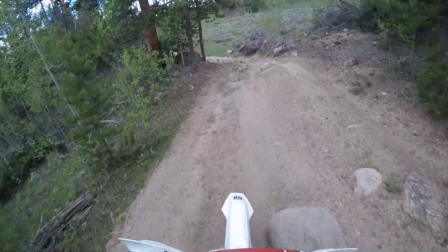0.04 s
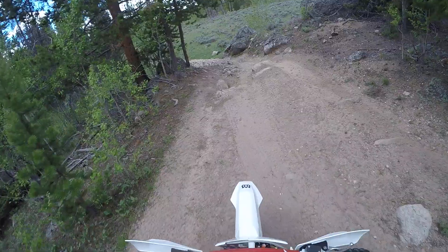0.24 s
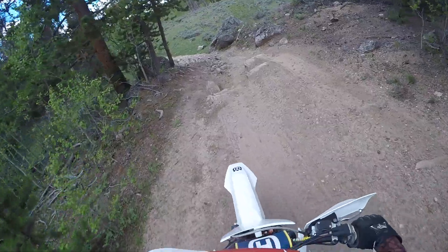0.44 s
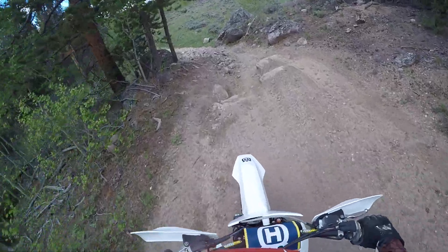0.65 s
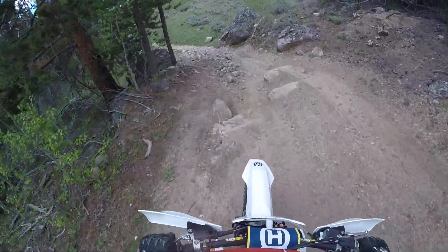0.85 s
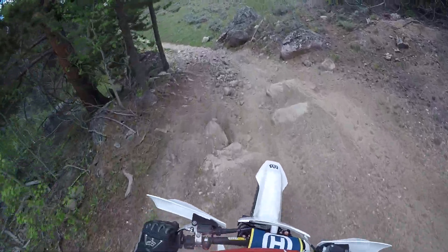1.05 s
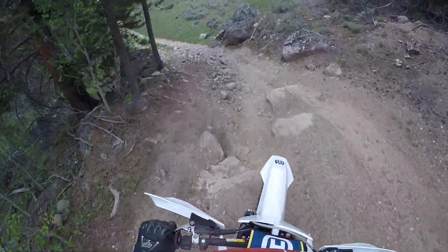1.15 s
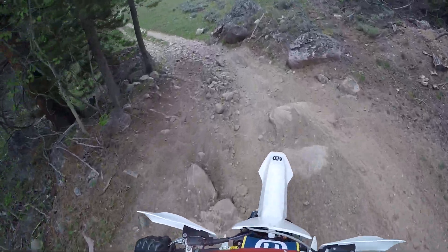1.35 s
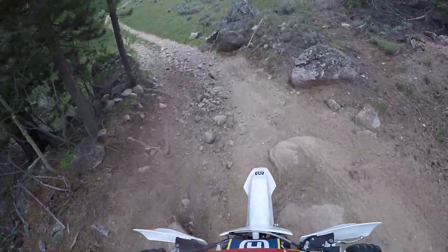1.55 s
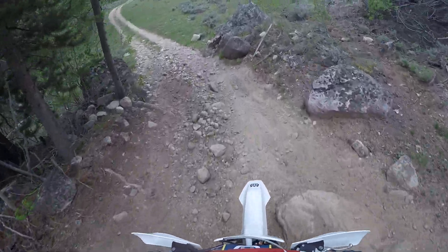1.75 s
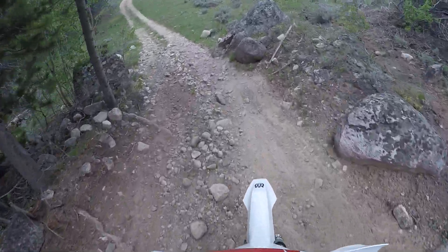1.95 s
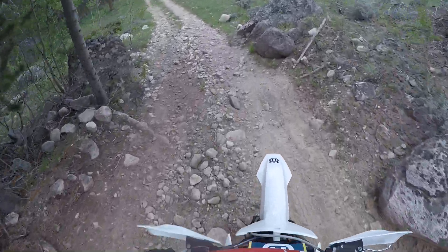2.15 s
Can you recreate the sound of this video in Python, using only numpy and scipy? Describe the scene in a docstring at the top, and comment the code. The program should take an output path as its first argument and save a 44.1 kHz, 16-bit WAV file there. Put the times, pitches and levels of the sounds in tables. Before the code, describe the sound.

Dirt bike engine thuds just above idle with metallic rattle, tyres grinding over a gritty trail

```python
"""Low thuds, a deep throb and a metallic rattle: a dirt bike rolls down a trail just above idle.
Its one-cylinder four-stroke engine is heard from the rider's place. The exhaust booms once a cycle, the
crank adds a deep tone, and chain and valves tap the ringing engine case, with a faint high whine.
The tyres are dense random grit, which scrubs harder near the end with a ringing wheel and gravel; fine
sand sizzles most before the middle. Air is filtered noise, a narrow hiss fades, one knock starts it all."""
import sys
import numpy as np
from scipy import signal
from scipy.fft import rfft, irfft
from scipy.io import wavfile

SR = 44100
rng = np.random.default_rng(int(sys.argv[2]) if len(sys.argv) > 2 else 0)


def generate_wav(signal):
    """Clip the signal to [-1, 1] and save it as 16-bit WAV at the path in sys.argv[1]."""
    frames = np.transpose(np.atleast_2d(signal))
    scaled = np.clip(frames, -1, 1) * 32767
    pcm = np.round(scaled).astype(np.int16)
    wavfile.write(sys.argv[1], SR, pcm)


N = 96711
TIME = np.arange(N) / SR  # seconds


def amp(db):
    """Turns decibels into a gain."""
    return 10 ** (np.asarray(db) / 20)


def unit(x):
    """Scales a sound to an rms (average strength) of 1."""
    return x / np.sqrt(np.mean(x ** 2) + 1e-20)


def curve(points):
    """Joins (time [s], value) points by straight lines."""
    return np.interp(TIME, *np.transpose(points))


def drift(top_hz):
    """Slow random motion of rms 1, mostly below top_hz."""
    hz = np.fft.rfftfreq(N, 1 / SR)
    low_pass = (hz > 0) / (1 + (hz / top_hz) ** 4)
    return unit(irfft(rfft(rng.standard_normal(N)) * low_pass, N))


def colour(x, points, size=16384):
    """Filters a sound to a (frequency [Hz], gain [dB]) shape without any sound ahead of its cause."""
    hz, db = np.transpose(points)
    bins_hz = abs(np.fft.fftfreq(size, 1 / SR))
    log_gain = np.log(amp(np.interp(np.log(bins_hz + 1), np.log(hz), db)))
    # the Hilbert transform finds the phase that makes the filter respond as early as possible
    spectrum = np.exp(np.conj(signal.hilbert(log_gain)))
    response = np.fft.ifft(spectrum).real[:size // 2]
    return signal.fftconvolve(x, response)[:N]


def grains(per_s, spread_db):
    """Tiny impacts at random moments, of random sign and uneven size, scaled to rms 1."""
    hits = rng.random(N) < per_s / SR
    signs = rng.choice([-1, 1], N)
    sizes = amp(spread_db * rng.standard_normal(N))
    return unit(hits * signs * sizes)


def ring(x, hz, width):
    """One decaying resonance: the wider its band (width [Hz]), the faster it dies away."""
    t = TIME[:SR // 10]
    response = width * np.exp(-np.pi * width * t) * np.sin(2 * np.pi * hz * t)
    return signal.fftconvolve(x, response)[:N]


def air():
    """Air on the microphone: lumpy low buffeting and a faint even rush, both filtered noise."""
    # tone of the buffeting: (frequency [Hz], gain [dB])
    buffet_tone = [(4, -59), (18, 7.5), (34, -3.5), (56, -4.5), (95, 0), (125, -17.5), (170, -26.5),
                   (300, -36.5), (500, -35.5), (900, -40.5), (2000, -103.5)]
    # gusts of the buffeting: (time [s], level [dB])
    gust_level = [(0, -27), (.07, -41.5), (.18, -37.5), (.32, -38), (.4, -36.5), (.54, -42.5), (.74, -40),
                  (.95, -48), (1.22, -36.5), (1.35, -43), (1.6, -41), (1.75, -38), (1.86, -36),
                  (1.93, -38.5), (2.19, -39)]
    # tone of the steady rush: (frequency [Hz], gain [dB])
    rush_tone = [(100, -4), (450, 1.5), (800, -8.5), (3000, -11.5), (5000, -13), (6300, -21.5), (8000, -22),
                 (11000, -24.5), (14000, -29.5), (16000, -37)]
    swell_db, swell_hz, rush_db = -1, 0.43, -61

    buffeting = unit(colour(rng.standard_normal(N), buffet_tone))
    buffeting *= amp(curve(gust_level) + swell_db * drift(swell_hz))
    rush = amp(rush_db) * unit(colour(rng.standard_normal(N), rush_tone))
    return buffeting + rush


def hiss():
    """A narrow band of hiss, noise through two equal resonances, that dies away."""
    centre_hz, width_hz, start_db, fade_db_per_s = 2425, 320, -53, 27
    band = ring(rng.standard_normal(N), centre_hz, width_hz)
    band = ring(band, centre_hz, width_hz)
    return amp(start_db - fade_db_per_s * TIME) * unit(band)


def whine(turns):
    """A thin, faint engine whine: noise in a narrow resonance, pulsing with each crank turn."""
    whine_hz, width_hz, level_db, pulsing_depth = 8600, 91, -81.5, 0.23
    pulsing = 1 + pulsing_depth * np.cos(2 * np.pi * 2 * turns)
    return amp(level_db) * unit(pulsing * ring(rng.standard_normal(N), whine_hz, width_hz))


def knock():
    """A short hollow knock from the bike and its rebound: fading rings and a burst of clatter."""
    # the blow and its rebound: (time [s], level [dB])
    blows = [(.0015, -33.5), (.0092, -39.5)]
    # rings of each blow: (frequency [Hz], level within the blow [dB], time to fade by 60 dB [s])
    knock_rings = [(790, -7.5, 0.042), (940, -7.5, 0.022), (1090, 1.5, .042), (1270, -22, 0.046)]
    # tone of the clatter: (frequency [Hz], gain [dB])
    clatter_tone = [(300, -3.5), (620, -26), (760, 6), (900, 3), (1060, 1.5), (1280, -13), (1600, -26),
                    (5000, -55)]
    clatter_db, clatter_t60_s = -0.5, 0.05  # level beside the rings, time to fade by 60 dB

    out = np.zeros(N)
    for start, level_db in blows:
        t = np.maximum(TIME - start, 0)
        rings = np.zeros(N)
        for hz, db, t60 in knock_rings:
            rings += amp(db) * np.exp(-np.log(1000) * t / t60) * np.sin(2 * np.pi * hz * t)
        fade = (t > 0) * np.exp(-np.log(1000) * t / clatter_t60_s)
        clatter = fade * unit(colour(rng.standard_normal(N), clatter_tone))
        out += amp(level_db) * (rings + amp(clatter_db) * clatter)
    return out


def tyres():
    """Dense grit grinds under the tyres, rings the front wheel and throws up gravel and fine sand."""
    # tone of the grit: (frequency [Hz], gain [dB])
    grit_tone = [(200, -5.5), (500, -6), (800, -10), (1120, -3), (1280, -3), (1520, -9.5), (1900, -4),
                 (2500, -1.5), (3100, -1.5), (3320, -11), (3550, -8), (4300, -19.5), (5500, -30),
                 (8000, -40), (15000, -51)]
    # grit as the tyres scrub: (time [s], level [dB])
    scrub_level = [(0, -54.5), (.13, -55), (.3, -53.5), (.48, -50), (.56, -54.5), (.7, -53.5), (.95, -59),
                   (1.22, -56.5), (1.5, -56.5), (1.59, -60.5), (1.64, -55.5), (1.7, -57.5), (1.83, -45.5),
                   (1.94, -47.5), (2.08, -48), (2.19, -50)]
    # loose stones crunching: (time [s], length [s], added level [dB])
    crunches = [(1.847, 0.017, 1.5), (1.882, .02, 3), (1.98, 0.026, 3), (2.05, 0.042, 3)]
    # tone of the coarse gravel: (frequency [Hz], gain [dB])
    gravel_tone = [(1500, -25), (2200, -2.5), (2500, 4.5), (3100, -1), (3320, -3.5), (3550, -4),
                   (4100, -8.5), (5000, -27), (9000, -41)]
    # gravel spraying when the tyre bites: (time [s], level [dB])
    gravel_level = [(1.62, -90), (1.74, -60), (1.84, -52.5), (1.95, -53.5), (2.05, -56), (2.19, -67)]
    # ring of the front wheel as it scrubs: (time [s], level [dB])
    wheel_level = [(0, -57), (.36, -57.5), (.45, -50), (.56, -59), (.68, -54), (.85, -75), (1.2, -66),
                   (1.55, -66), (1.72, -56), (1.79, -49.5), (1.835, -46), (1.92, -47.5), (1.98, -50),
                   (2.04, -48), (2.19, -58)]
    # tone of the fine sand: (frequency [Hz], gain [dB])
    sand_tone = [(2500, -35.5), (4100, -3.5), (4600, 0.5), (5000, 0.5), (5500, -10), (6200, -14),
                 (6850, -9.5), (7500, -24), (12000, -27)]
    # spraying sand: (time [s], level [dB])
    sand_level = [(0, -68), (.45, -70.5), (.65, -65), (.82, -65.5), (1.1, -71.5), (1.5, -70), (1.7, -76),
                  (2.19, -68)]
    grit_per_s, gravel_per_s, grain_spread_db = 12000, 2800, 2.5
    flicker_db, flicker_hz = .5, 21
    wheel_hz, wheel_width_hz = 1505, 325

    flicker = flicker_db * drift(flicker_hz)
    crunch = sum(db * np.exp(-(2 * (TIME - at) / length) ** 2) for at, length, db in crunches)

    grit = unit(colour(grains(grit_per_s, grain_spread_db), grit_tone))
    grit *= amp(curve(scrub_level) + flicker + crunch)

    gravel = unit(colour(grains(gravel_per_s, grain_spread_db), gravel_tone))
    gravel *= amp(curve(gravel_level) + flicker + crunch)

    wheel = ring(grains(grit_per_s, grain_spread_db), wheel_hz, wheel_width_hz)
    wheel = ring(wheel, wheel_hz, wheel_width_hz)  # the second pass narrows the band
    wheel = amp(curve(wheel_level)) * unit(wheel)

    sand = unit(colour(grains(grit_per_s, grain_spread_db), sand_tone))
    sand *= amp(curve(sand_level))
    return grit + gravel + wheel + sand


def rattle(turns):
    """The chain patters steadily on the ringing case; valves tap it at fixed places with varying force."""
    # valve gear strokes: (place [cycles], width [cycles], level [dB], brightness [dB per octave])
    valve_strokes = [(.15, 0.019, 4, 6), (.22, 0.064, 2.5, -3), (.29, 0.01, 6, 7.5), (.44, 0.074, -6, 2.5),
                     (.595, 0.038, 3.5, -3), (.66, 0.018, 6.5, 2.5), (.81, .02, 5, 2),
                     (.91, 0.058, 5.5, 0.5)]
    # rings of the engine case: (frequency [Hz], width [Hz], gain [dB])
    case_rings = [(1100, 78, 2.5), (1357, 78, -3.5), (1420, 520, -12), (1850, 230, 0.5), (2252, 73, 5.5),
                  (2497, 210, -2), (2860, 330, -11.5), (3584, 260, -8.5), (4546, 110, -11.5),
                  (4710, 130, -25.5), (4940, 130, -18), (5634, 69, -14), (6920, 91, -27.5)]
    # the small case radiates low notes poorly: (frequency [Hz], gain [dB])
    case_low_cut = [(800, -1.5), (1080, 5)]
    # the whole rattle: (time [s], level [dB])
    rattle_level = [(0, -53.5), (.3, -52.5), (.75, -51.5), (1, -55.5), (1.3, -55), (1.55, -54), (1.8, -52),
                    (2.19, -50.5)]
    chain_db, stroke_spread_db = -2.5, 2  # the chain is steady, the strokes vary
    taps_per_s, tap_spread_db = 4000, 3
    case_middle_hz = 2520  # brightness tilts the strokes around this frequency

    strokes = []
    for place, width, db, bright_db in valve_strokes:
        cycle, phase = np.divmod(turns - place + .5, 1)
        # one random force for each cycle
        force_db = db + stroke_spread_db * rng.standard_normal(size=64)[cycle.astype(int)]
        bump = np.exp(-.5 * ((phase - .5) / width) ** 2)
        strokes.append((amp(force_db) ** 2 * bump, bright_db))

    case = np.zeros(N)
    for hz, width, db in case_rings:
        octaves = np.log2(hz / case_middle_hz)
        power = amp(chain_db) ** 2  # powers of chain and strokes add up
        for blow, bright_db in strokes:
            power = power + blow * amp(bright_db * octaves) ** 2
        taps = np.sqrt(power) * grains(taps_per_s, tap_spread_db)
        case += amp(db) * ring(taps, hz, width)
    return amp(curve(rattle_level)) * unit(colour(case, case_low_cut))


def throb(turns):
    """The crank turns twice per firing and shakes out a deep tone with its octave."""
    # the throb before the lift below: (time [s], level [dB])
    throb_level = [(0, -33), (.09, -27), (.135, -34), (.21, -26), (.26, -30.5), (.3, -25.5), (.35, -26),
                   (.395, -31), (.43, -26.5), (.545, -29.5), (.59, -25), (.66, -27.5), (.73, -24),
                   (.81, -28), (.87, -25), (.98, -28.5), (1.135, -28.5), (1.18, -25), (1.32, -28),
                   (1.41, -28.5), (1.445, -30), (1.52, -26.5), (1.63, -32), (1.75, -26), (1.84, -30),
                   (1.92, -39), (2, -33), (2.045, -35), (2.1, -30), (2.19, -27.5)]
    lift_db, octave_db = 1, -17.5
    lead_turns, waver_turns, waver_hz = .03, .035, 11.0  # in crank turns

    crank_turns = 2 * turns + lead_turns + waver_turns * drift(waver_hz)
    crank = 2 * np.pi * crank_turns  # angle in radians
    tone = -np.cos(crank) - amp(octave_db) * np.cos(2 * crank)
    return amp(lift_db + curve(throb_level)) * unit(tone)


def exhaust(turns):
    """One pressure pulse per firing booms through the silencer, echoes off the ground and trails gas."""
    # boom of one pulse: (frequency [Hz], gain [dB])
    boom_tone = [(4, -24), (20, -25), (50, 2.5), (68, -6.5), (100, -2), (122, -20), (150, -19.5),
                 (172, -27), (208, -15.5), (245, -14.5), (285, -20), (345, -21.5), (375, -37), (440, -30.5),
                 (520, -56), (2000, -88.5)]
    # strength of the pulses: (time [s], level [dB])
    effort_level = [(0, -38.5), (.45, -42.5), (.7, -40), (.9, -40.5), (1.3, -40), (1.7, -39.7), (1.82, -41),
                    (1.9, -41), (2.05, -40.5), (2.19, -40.5)]
    # tone of the turbulent gas after each pulse: (frequency [Hz], gain [dB])
    gas_tone = [(100, -14.5), (160, -4), (220, -14), (330, 1), (420, -8), (600, -37.5), (1500, -69)]
    spread_db, jitter_s = .7, 0.00035  # random strength and timing of the pulses
    echo_s, echo_db = .0143, -10
    gas_db, gas_decay_turns = -64.5, 0.21  # decay in engine cycles

    firings = np.flatnonzero(np.diff(np.floor(turns)) > 0)
    timing, strength = rng.standard_normal((len(firings), 2)).T
    places = firings + (timing * jitter_s * SR).astype(int)
    pulses = np.zeros(N)
    pulses[np.clip(places, 0, N - 1)] = amp(spread_db * strength)
    echo = np.pad(pulses, (round(echo_s * SR), 0))[:N]
    pulses = pulses + amp(echo_db) * echo
    booms = amp(curve(effort_level)) * unit(colour(pulses, boom_tone))

    puffs = np.exp(-(turns % 1) / gas_decay_turns) * rng.standard_normal(N)
    return booms + amp(gas_db) * unit(colour(puffs, gas_tone))


def scene():
    """Adds all sources; the exhaust, throb, rattle and whine follow one count of engine cycles."""
    # engine speed: (time [s], speed [firings per second])
    engine_speed = [(0, 18.232), (.25, 17.198), (.45, 17.327), (.65, 17.175), (.77, 16.365), (.88, 17.197),
                    (1.05, 16.92), (1.38, 16.606), (1.65, 16.84), (1.9, 16.339), (2.04, 16.866),
                    (2.19, 16.34)]
    first_firing_turns = .535  # engine cycles until the first firing
    turns = np.cumsum(curve(engine_speed)) / SR - first_firing_turns

    surroundings = air() + hiss() + knock() + tyres()
    engine = whine(turns) + rattle(turns) + throb(turns) + exhaust(turns)
    return (surroundings + engine)[None]


def record(dry):
    """Removes the treble above a steep edge."""
    edge_hz = 15200
    low_pass = signal.firwin(511, edge_hz, window=("kaiser", 9), fs=SR)
    return signal.oaconvolve(dry, low_pass[None], "same")


dry = scene()
out = record(dry)
generate_wav(out)
```